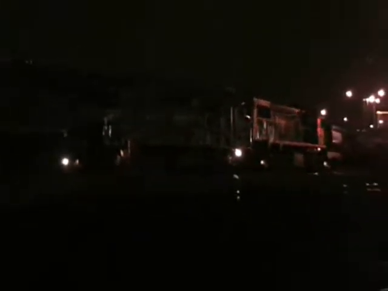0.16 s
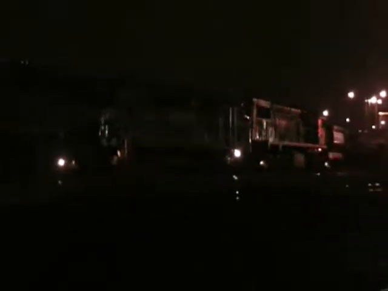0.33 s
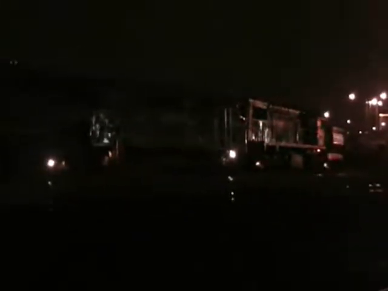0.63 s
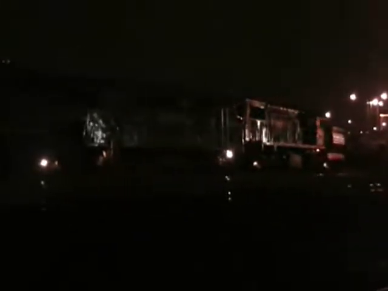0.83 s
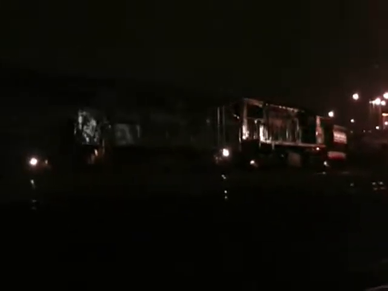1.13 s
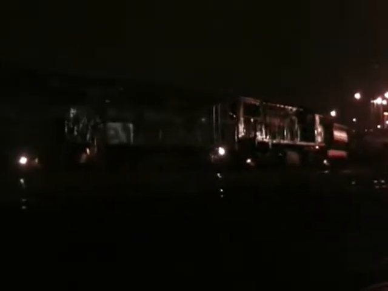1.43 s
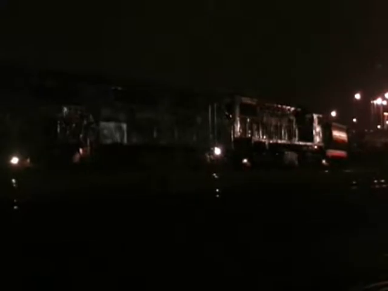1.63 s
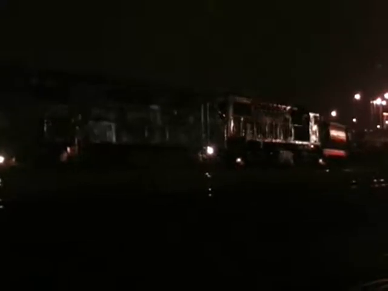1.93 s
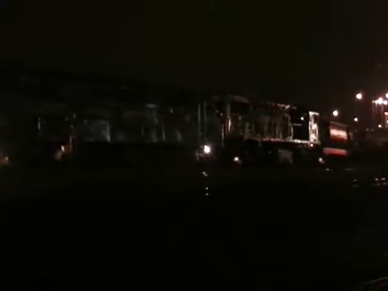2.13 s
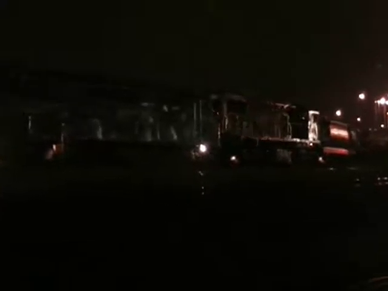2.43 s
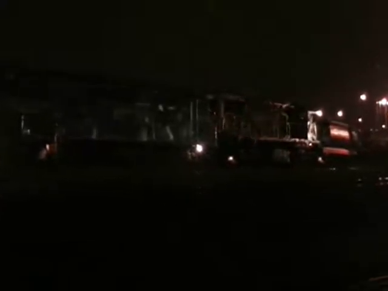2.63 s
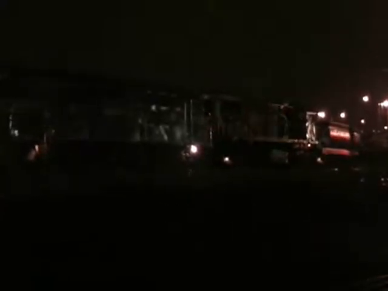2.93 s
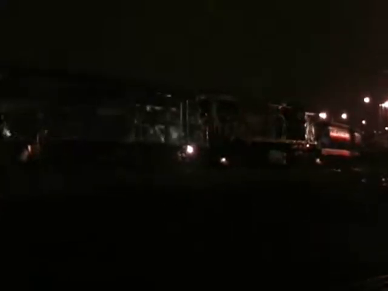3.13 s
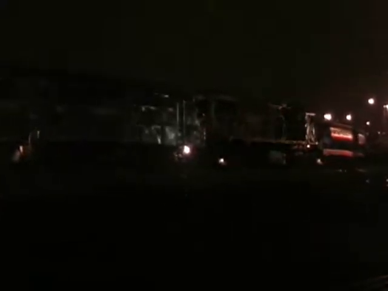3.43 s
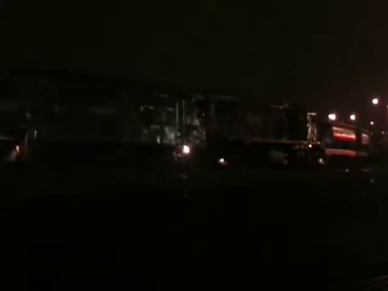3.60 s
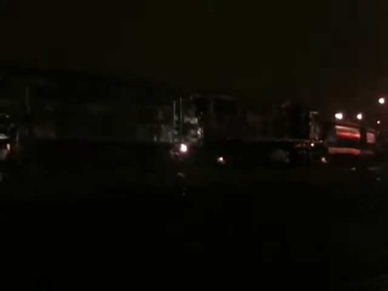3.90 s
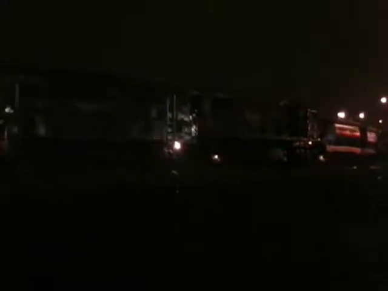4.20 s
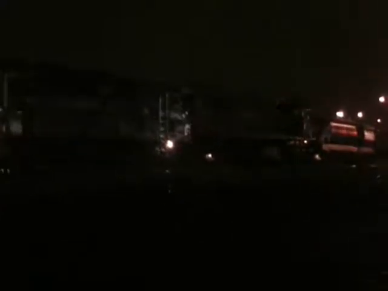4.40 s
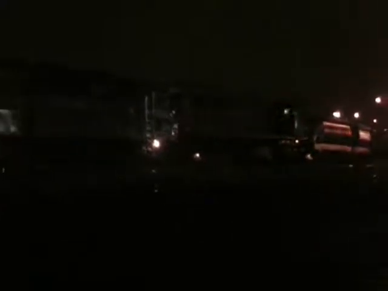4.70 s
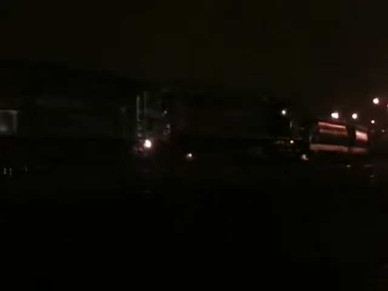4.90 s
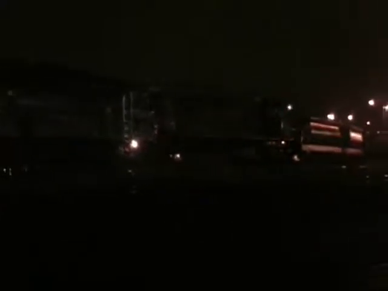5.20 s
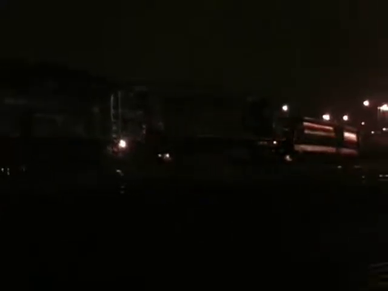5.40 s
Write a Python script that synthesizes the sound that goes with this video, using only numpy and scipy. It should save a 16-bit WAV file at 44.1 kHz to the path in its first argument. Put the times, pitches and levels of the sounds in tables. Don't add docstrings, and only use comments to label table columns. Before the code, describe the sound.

Freight train passing at night: low diesel hum and rushing wheel noise, with intermittent piercing whine early on. Around two seconds one engine climbs in pitch and a rough air jet blows off in three joined surges. Afterwards that engine is gone, a second engine's uneven throb and fan drone rise in pitch and level out, and scattered short airy chirps spit to the end. Open yard, small stereo camera microphone, little deep bass.

```python
import sys
import numpy as np
from scipy import signal
from scipy.fft import rfft, irfft
from scipy.io import wavfile
from scipy.ndimage import uniform_filter1d

SR = 44100
rng = np.random.default_rng(int(sys.argv[2]) if len(sys.argv) > 2 else 0)


def dump(signal):
    limited = np.clip(np.atleast_2d(signal).T, -1, 1)
    pcm = np.round(limited * 32767).astype(np.int16)
    wavfile.write(sys.argv[1], SR, pcm)


def level_to_linear(level):
    exponent = np.asarray(level, float) / 20
    return 10 ** exponent


N = 244755
T = np.arange(N) / SR

# (frequency [Hz], level [dB per Hz])
WIND_COLOUR = [(20, -33), (45, -5), (80, 1), (150, 1), (250, -17), (500, -27), (1000, -54)]

# (time [s], level [dB])
ROAR_LEVEL = [(0, -22.5), (.75, -21.5), (1.3, -22), (1.8, -20.5), (2.3, -22), (3.1, -22.5), (3.35, -21),
              (3.9, -20), (4.5, -20.5), (5.55, -21)]
# (time [s], brightness [0-1])
ROAR_BRIGHTNESS = [(1.8, 0), (2.05, 0.92), (2.7, 0.7), (3.15, 1), (3.9, 0.66), (5.55, 0.94)]
# (frequency [Hz], level [dB per Hz])
DULL_COLOUR = [(20, -55), (35, -29), (60, 1), (120, -6.5), (200, -6), (400, -8), (750, -6), (950, -12),
               (1450, -16.5), (1900, -15.5), (2700, -23), (5000, -28), (7500, -45), (10000, -47.5),
               (13000, -78)]
# (frequency [Hz], level [dB per Hz])
BRIGHT_COLOUR = [(20, -54), (35, -20), (60, 2.5), (120, -12.5), (220, -5), (380, -10), (700, -7),
                 (1300, -14.5), (1900, -13), (2600, -18.5), (5200, -26.5), (7500, -40.5), (10000, -49.5),
                 (13000, -91)]

# (start [s], end [s], pitch [Hz], level [dB])
AUXILIARY_HUMS = [
    (0, 1.15, 748, -37),
    (0, .7, 495.6, -38),
    (4.6, 5.02, 1048, -29),
    (5.02, 5.5, 1042, -34),
]

# (start [s], end [s], surge level [dB])
AIR_SURGES = [
    (2.162, 2.498, -21.5),
    (2.507, 2.89, -20),
    (2.892, 3.07, -20),
]
# (frequency [Hz], level [dB per Hz])
JET_COLOUR = [(500, -38), (900, -8), (1330, -5), (1800, -5.5), (2600, -9.5), (4000, -6.5), (5200, -10.5),
              (7500, -33.5), (10000, -35), (13000, -89)]
# (time [s], frequency [Hz])
GROUND_ECHO_DIP = [(2.3, 2580), (2.55, 3200), (3.1, 3270)]
# (start [s], length [s], hiss level [dB], whistle pitch [Hz])
DRAIN_SPITS = [(0.663, .05, -35, 2830), (3.317, 0.019, -29.5, 2630), (3.41, 0.055, -28, 2780),
               (3.525, 0.088, -24.5, 3230), (3.702, 0.069, -34, 2980), (3.783, 0.07, -30, 3300),
               (4.255, 0.088, -28, 3170), (4.37, 0.068, -30.5, 3300), (4.467, 0.055, -23.5, 3320),
               (4.545, 0.069, -23, 3330), (4.644, 0.026, -25, 3300), (4.723, 0.055, -26.5, 3240),
               (4.826, .09, -27, 3226), (4.915, 0.11, -31, 3120), (5.065, 0.11, -30, 3130),
               (5.196, .06, -29.5, 3100), (5.255, .04, -32, 3300), (5.398, 0.12, -31, 3030)]
# (frequency [Hz], level [dB per Hz])
SPIT_COLOUR = [(900, -28), (1600, -7.5), (2500, -4), (3300, -7.5), (4200, -4.5), (5400, -8), (7000, -19),
               (9000, -21), (14000, -77)]
# (time [s], whistle against hiss [dB])
WHISTLE_SHARE = [(.7, -0.5), (3.3, -6), (3.8, -8), (4.25, -1.5), (4.6, -3.5), (4.9, 1.5), (5.4, -2.5)]

# (multiple of firing rate, level idling [dB], level revving [dB])
LEAD_EXHAUST_LINES = [(1, -40, -36), (2, -31.5, -29.5), (3, -33, -32.5), (4, -38, -57), (5, -44.5, -25.5),
                      (7, -36.5, -35)]
# (multiple of firing rate, level idling [dB], level revving [dB])
LEAD_GEAR_LINES = [(16, -42, -52), (17, -39.5, -45), (20, -45, -32.5), (24, -45, -45), (25, -41, -47),
                   (30, -38, -46), (34, -55, -50), (40, -40.5, -36), (45, -61, -44)]

# (time [s], level [dB])
TRAIL_LOAD = [(0, -5), (1.9, -16), (2.55, -6), (3, -2), (3.9, 0.5), (4.6, -0.5), (5.55, 1)]
# (time [s], shaft speed [turns per s])
SHAFT_SPEED = [(0, 5.06), (1.9, 5.06), (2.1, 5.11), (2.55, 5.21), (3.02, 5.43), (3.5, 5.69), (3.9, 5.92),
               (4.3, 6.085), (4.6, 6.15), (4.9, 6.16), (5.2, 6.14), (5.55, 6.1)]
# (multiple of shaft rate, level climbing [dB], level at full speed [dB])
TRAIL_EXHAUST_LINES = [(8.99, -30.5, -31), (10.07, -30, -24), (11, -29, -42), (13.03, -37, -29),
                       (13.97, -32, -36.5), (15, -29.5, -30), (15.93, -27, -30.5), (16.98, -33, -31.5),
                       (17.95, -32.5, -36), (20, -43, -54), (23.05, -54, -55), (24.25, -35.5, -31.5),
                       (26, -48, -46), (26.2, -43, -51), (29.5, -39.5, -58), (30.75, -40, -34.5),
                       (31.9, -33.5, -45.5), (32.66, -53, -45), (37.4, -33, -55), (42.7, -39, -47)]
THUMP_DELAY = [(9.5, .22), (10.5, .06), (12, .3), (13.5, -.03), (14.5, -.04), (15.5, .08), (16.5, -.25),
               (17.5, -.38)]
# (multiple of blade rate, level [dB])
FAN_LINES = [(2, -36), (3, -38.5), (4, -39), (6, -48)]
# (time [s], share of speed lost [0-1])
BLOWER_SLIPPING = [(3.1, 0), (3.6, .007), (4.4, .014), (5.55, .012)]
# (start [s], length [s], level [dB])
WHINE_GAPS = [(.5, .11, -38), (.66, .07, -33.5), (.88, .22, -38), (1.21, .21, -37), (1.46, .14, -28),
              (1.68, .37, -30.5), (2.05, .28, -38), (2.34, .04, -32), (2.39, .25, -35), (3.52, .1, -41),
              (3.66, .2, -39), (4.25, .06, -38), (5.1, .45, -45)]

# (frequency [Hz], likeness [0-1], left lead [rad], left minus right early [dB], late [dB])
PORT_PAIR = [(35, .96, -1.74, 5.3, 4.3), (69, .995, -1.3, 0, 0), (135, .99, -.55, -3.5, -3.3),
             (190, .98, -.25, -4.4, -3.7), (280, .98, .13, -2, -1.6), (400, .975, .1, -.4, 0),
             (725, .965, -.12, .3, 1.8), (1400, .94, -.24, .3, 1.1), (2800, .93, -.45, -.5, .6),
             (3900, .93, -.65, -.2, -.7), (5400, .88, -.87, -.8, -3), (7600, .55, -2.2, -2.5, -4.5),
             (9500, .6, -2.9, -2.4, -2), (11500, .8, -1.6, -1.2, -1.2)]


def evened(x):
    return x / np.sqrt(np.mean(x ** 2) + 1e-20)


def read(hz, points_hz, values):
    return np.interp(np.log(hz + 1), np.log(np.asarray(points_hz) + 1), values)


def curves(rows, t=T):
    s, *columns = np.transpose(rows)
    return [np.interp(t, s, c) for c in columns]


def after(s):
    return np.maximum(T - s, 0)


def opened(start, end, edge):
    return np.clip(np.minimum(T - start, end - T) / edge + .5, 0, 1)


def wander(per_s):
    knots = rng.standard_normal(1200)
    return np.interp(T * per_s, np.arange(len(knots)), knots) * np.sqrt(3 / 2)


def noise(colour):
    gain = level_to_linear(read(np.fft.rfftfreq(N, 1 / SR), *np.transpose(colour)))
    return evened(irfft(rfft(rng.standard_normal(N)) * gain, N))


def line(turns, waver_db, per_s, start=None):
    start = rng.random() if start is None else start
    swell = np.exp(waver_db * np.log(10) / 20 * wander(per_s))
    return np.sqrt(2) * swell * np.cos(2 * np.pi * (turns + start) + 0.21 * wander(per_s))


def gust():
    arrives_s, leaves_s, level_db = 1.04, 1.42, -24
    rise_db_per_s, fall_db_per_s = 280, 95
    rise_db = rise_db_per_s * (arrives_s - T).clip(0)
    fall_db = fall_db_per_s * after(leaves_s)
    level = level_to_linear(level_db - rise_db - fall_db + 2.5 * wander(18.4))
    push, left, right = noise(WIND_COLOUR), noise(WIND_COLOUR), noise(WIND_COLOUR)
    return level * np.array([push + 0.44 * left, -.8 * push + .45 * right])


def roar():
    frames, hz = N // 256 + 5, np.fft.rfftfreq(1024, 1 / SR)
    frame_s = np.arange(frames) * 256 / SR
    real, imag, patches = rng.standard_normal((frames, 513, 3)).T
    patches = uniform_filter1d(patches, 10, 0)
    patches = evened(uniform_filter1d(patches, 16, 1))
    level_db = curves(ROAR_LEVEL, frame_s)[0]
    bright = curves(ROAR_BRIGHTNESS, frame_s)[0]
    dull_db = read(hz, *np.transpose(DULL_COLOUR))[:, None]
    bright_db = read(hz, *np.transpose(BRIGHT_COLOUR))[:, None]
    shape = level_to_linear((1 - bright) * dull_db + bright * bright_db)
    body = (hz > 250) & (hz < 900)
    shape = shape / np.sqrt((shape[body] ** 2).sum(0))
    shape = shape * level_to_linear(level_db + 0.74 * patches)
    return signal.istft((real + 1j * imag) * shape, nperseg=1024, noverlap=768)[1][:N] * level_to_linear(2.5)


def hums():
    total = np.zeros(N)
    for start, end, hz, db in AUXILIARY_HUMS:
        uncovered = np.clip(np.minimum(T - start + 0.078, end - T + .05) / 0.063, 0, 1)
        total += level_to_linear(db) * line(hz * T, 1.2, 15.0) * uncovered
    return total


def air_jet():
    sag_db, sag_s, valve_s = -3, 0.1, 0.027
    leak_db, leak_builds_db_per_s = -29, 60
    linger_db, linger_falls_db_per_s, linger_ends_s = -29, 3.5, 4.0
    ground_share = 0.32
    first, last = AIR_SURGES[0][0], AIR_SURGES[-1][1]
    flow = np.zeros(N)
    for start, end, db in AIR_SURGES:
        sag = sag_db * (1 - np.exp(-after(start) / sag_s))
        flow += opened(start, end, valve_s) * level_to_linear(db + sag)
    flow += level_to_linear(leak_db - leak_builds_db_per_s * (first - T).clip(0)) * (T < first)
    flow += level_to_linear(linger_db - linger_falls_db_per_s * after(last)) * opened(last, linger_ends_s, 0.083)
    jet = flow * level_to_linear(3.5 + 1.1 * wander(39.9)) * noise(JET_COLOUR)
    echo_delay_s = .5 / curves(GROUND_ECHO_DIP)[0]
    return jet + ground_share * np.interp(T - echo_delay_s, T, jet)


def drain_spits():
    whistle_sag_hz_per_s, whistle_width_hz = 2000, 190
    total = np.zeros(N)
    flutter = level_to_linear(1.16 * wander(70.))
    hiss = noise(SPIT_COLOUR)
    drive = rng.standard_normal(N) + 1j * rng.standard_normal(N)
    r = np.exp(-np.pi * whistle_width_hz / SR)
    for _ in range(2):
        drive = signal.lfilter([1 - r], [1, -r], drive)
    for s, length, hiss_db, hz in DRAIN_SPITS:
        part = slice(int(s * SR), int((s + length + 0.093) * SR))
        t = T[part] - s
        gate = np.clip(t / 0.0081, 0, 1) * np.exp(-np.maximum(t - length, 0) / 0.0093)
        pitch = hz - whistle_sag_hz_per_s * (t - length / 2)
        whistle = evened((drive[part] * np.exp(2j * np.pi * np.cumsum(pitch) / SR)).real)
        mouth = hiss[part] + level_to_linear(curves(WHISTLE_SHARE, s)[0]) * whistle
        total[part] += gate * flutter[part] * level_to_linear(hiss_db) * mouth
    return total


def lead_engine():
    idle_hz, rev_s, rev_hz_per_s, knee_s = 42.19, 1.97, 10.02, .04
    tone_changes_hz = (42.4, 43.4)
    hz = idle_hz + rev_hz_per_s * knee_s * np.logaddexp(0, (T - rev_s) / knee_s)
    turns = np.cumsum(hz) / SR
    screened_db = -10 * np.exp(-((T - 1.58) / 0.36) ** 2)
    exhaust_db = 2 - 35 * after(2.35) + screened_db
    gears_db = -3 + 2.6 * T - 40 * after(2.9)
    exhaust, gears = np.zeros(N), np.zeros(N)
    for order, *db in LEAD_EXHAUST_LINES:
        exhaust += np.interp(hz, tone_changes_hz, level_to_linear(db)) * line(round(order) * turns, 2.05, 3.92)
    for order, *db in LEAD_GEAR_LINES:
        gears += np.interp(hz, tone_changes_hz, level_to_linear(db)) * line(round(order) * turns, 2.2, 12.0)
    return level_to_linear(exhaust_db) * exhaust + level_to_linear(gears_db) * gears


def trail_blower(shaft, turns):
    teeth_per_turn, wobble_hz = 850, 17
    screened_db, gap_edge_s = -44, .065
    geared = np.cumsum(shaft * (1 - curves(BLOWER_SLIPPING)[0])) / SR
    wobble = np.cumsum(wobble_hz * np.cos(2 * np.pi * (turns + .32))) / SR
    teeth = teeth_per_turn * geared + wobble
    smear = wander(210.) * np.cos(2 * np.pi * teeth) + wander(210.) * np.sin(2 * np.pi * teeth)
    rough = np.interp(T, (2.6, 3.4), (.22, .95))
    heard = np.full(N, level_to_linear(screened_db))
    for s, length, db in WHINE_GAPS:
        heard += level_to_linear(db) * opened(s, s + length, gap_edge_s)
    return heard * (np.sqrt(1 - rough) * line(teeth, 0.51, 30.46) + np.sqrt(rough) * smear)


def trail_engine():
    climb_ends_s, blades_per_turn = (4.4, 5.3), 39.3
    load_db = curves(TRAIL_LOAD)[0]
    shaft = curves(SHAFT_SPEED)[0]
    turns = np.cumsum(shaft) / SR
    lag = np.cumsum(np.interp(np.arange(60) - .5, *np.transpose(THUMP_DELAY)))
    exhaust, fan = np.zeros(N), np.zeros(N)
    for order, *db in TRAIL_EXHAUST_LINES:
        order = round(order)
        exhaust += np.interp(T, climb_ends_s, level_to_linear(db)) * line(order * turns, 1.16, 2.18, -lag[order])
    for order, db in FAN_LINES:
        fan += level_to_linear(db) * line(order * blades_per_turn * turns, 5.0, 22.)
    fan_db = 0.1 + 1.9 * load_db
    return level_to_linear(load_db) * exhaust + level_to_linear(fan_db) * fan + trail_blower(shaft, turns)


def ports(x):
    hz, t, z = signal.stft(x, SR, nperseg=2048)
    points_hz, *columns = np.transpose(PORT_PAIR)
    same, lead, early_db, late_db = (read(hz, points_hz, c)[:, None] for c in columns)
    same = np.clip(same, 0, 1)
    moved = np.clip((t - 1.2) / 2.0, 0, 1)
    difference_db = (1 - moved) * early_db + moved * late_db
    tilt = level_to_linear(difference_db / 2) * np.exp(.5j * lead)
    scrambled = z * np.exp(2j * np.pi * rng.random(z.shape)) * np.sqrt(2)
    direct = np.sqrt((1 + same) / 2) * z
    spread = np.sqrt((1 - same) / 2) * scrambled
    pair = np.array([(direct + spread) * tilt, (direct - spread) / tilt])
    return signal.istft(pair, SR, nperseg=2048)[1][:, :N]


def scene():
    far = roar() + hums() + air_jet() + drain_spits() + lead_engine() + trail_engine()
    return ports(far) + gust()


def roll_off(x):
    return signal.sosfilt(signal.butter(12, 13030, fs=SR, output="sos"), x)


def record(dry):
    bass_cut = signal.butter(3, 36, "high", fs=SR, output="sos")
    mix = signal.sosfilt(bass_cut, dry) + .003
    return roll_off(mix)


dry = scene()
out = record(dry)
dump(out)
```